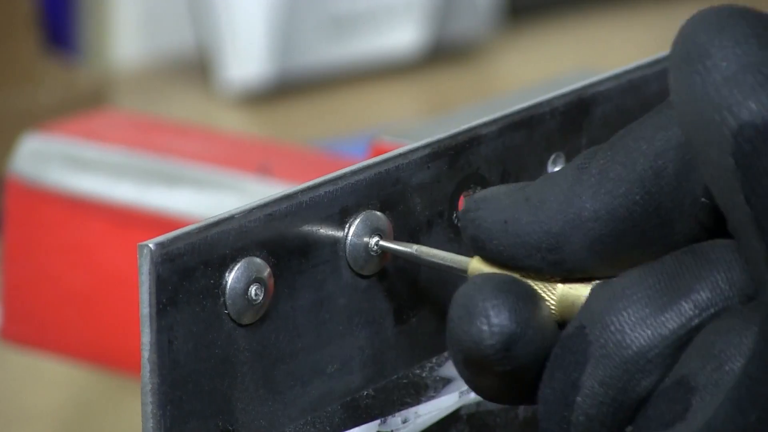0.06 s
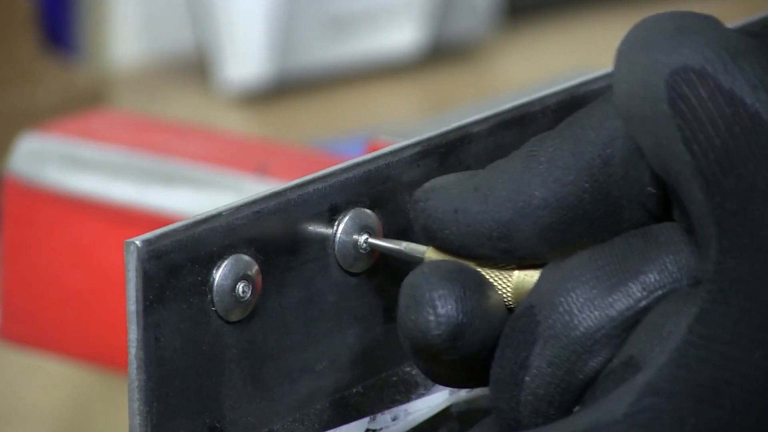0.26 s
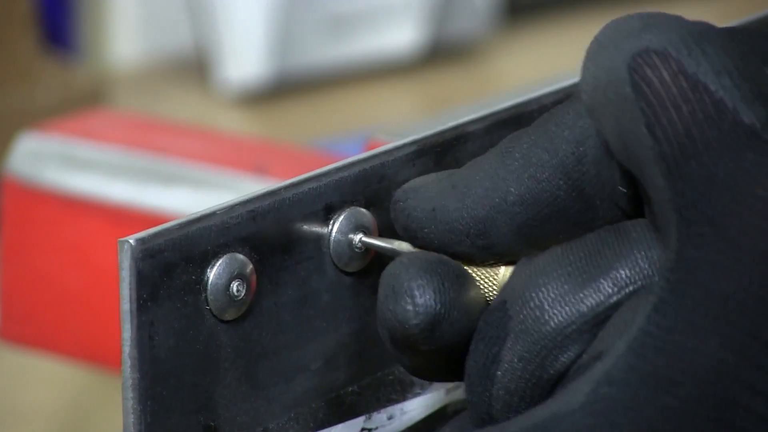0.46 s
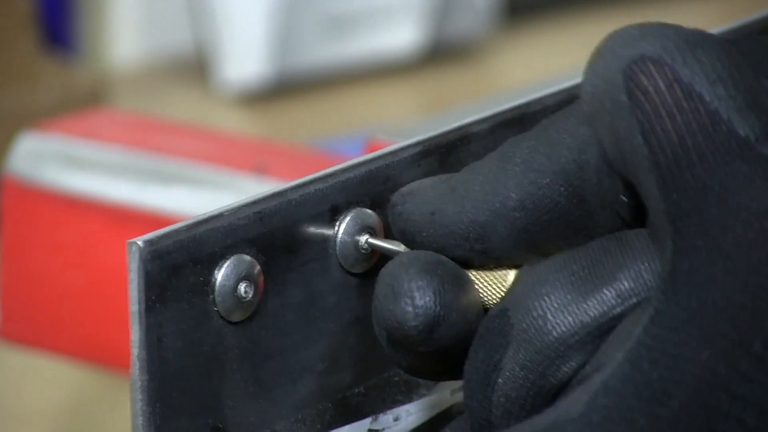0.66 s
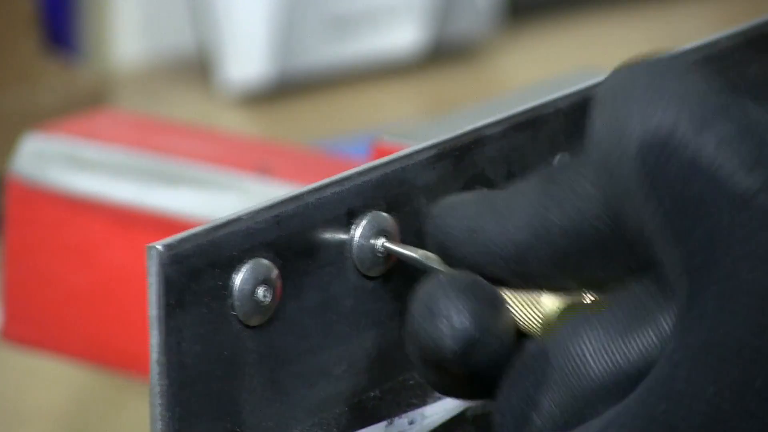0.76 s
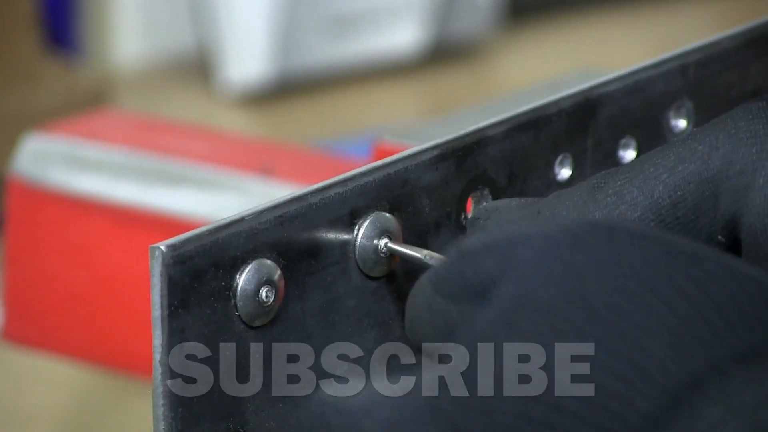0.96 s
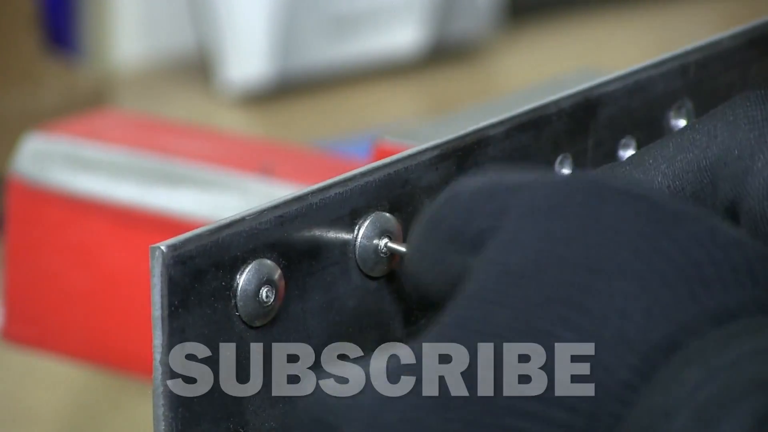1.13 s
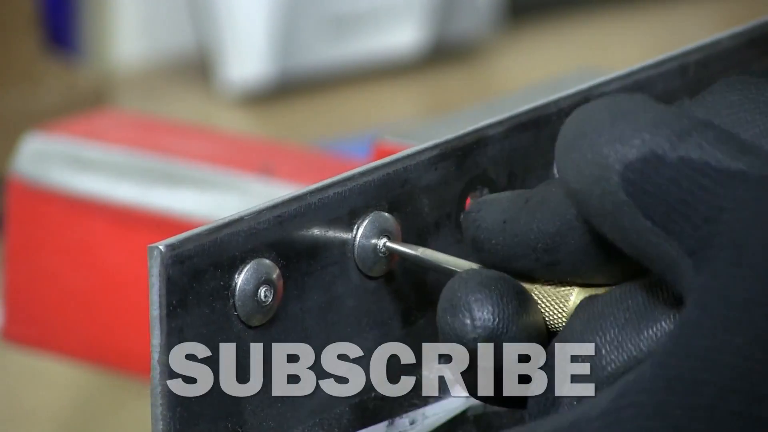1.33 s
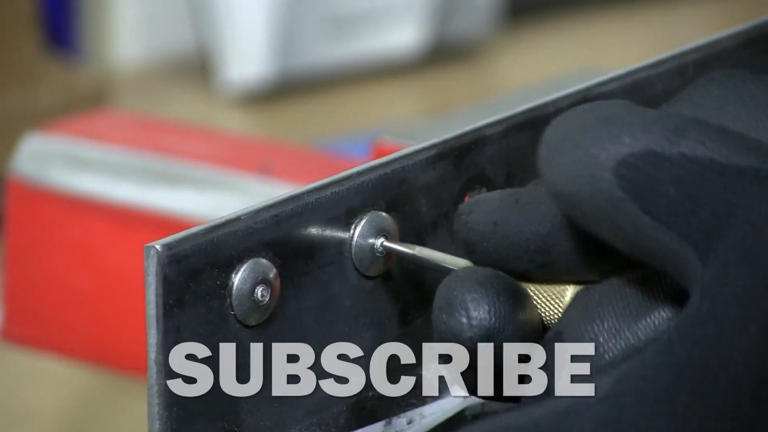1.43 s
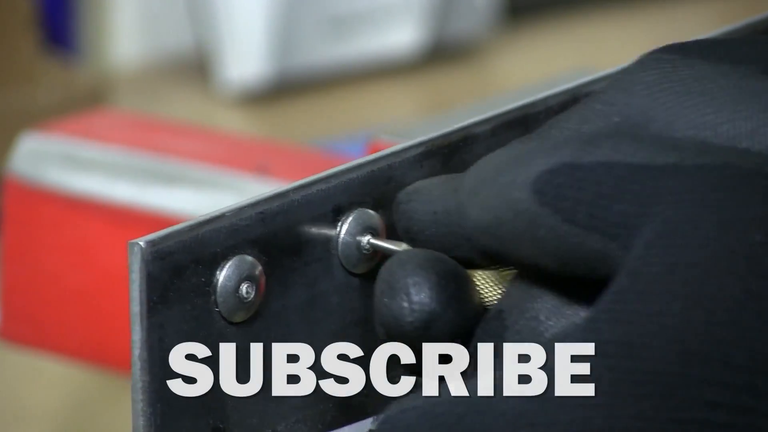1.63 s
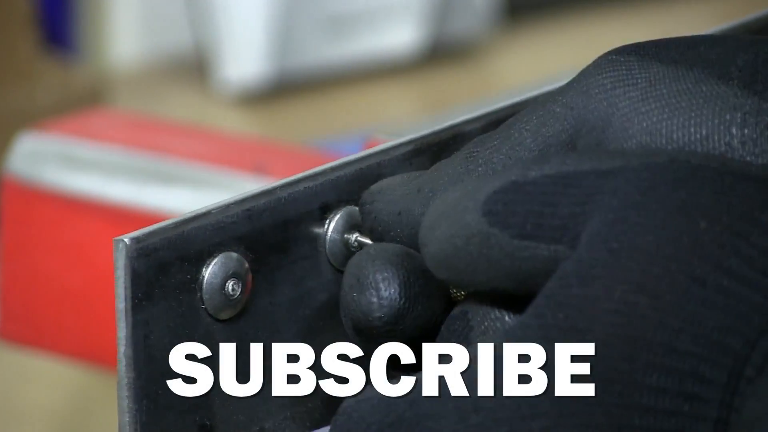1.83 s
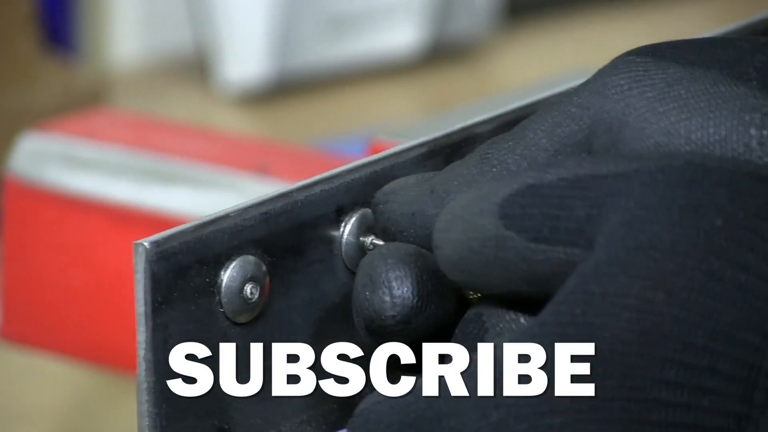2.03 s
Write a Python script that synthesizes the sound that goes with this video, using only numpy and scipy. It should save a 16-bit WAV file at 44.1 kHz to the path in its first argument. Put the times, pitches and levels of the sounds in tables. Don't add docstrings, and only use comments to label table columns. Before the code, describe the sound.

Two hard metallic punch clicks on a riveted steel plate, faint scraping between, in a quiet workshop

```python
import sys
import numpy as np
from scipy import signal
from scipy.fft import rfft, irfft, next_fast_len
from scipy.io import wavfile
from scipy.ndimage import uniform_filter1d

SR = 44100
rng = np.random.default_rng(int(sys.argv[2]) if len(sys.argv) > 2 else 0)


def unload_audio(sound):
    columns = np.transpose(np.atleast_2d(sound))
    steps = np.round(np.clip(columns, -1, 1) * 32767)
    wavfile.write(sys.argv[1], SR, steps.astype(np.int16))


def makeup_ratio(level_db):
    decades = np.asarray(level_db, float) / 20
    return 10 ** decades


N = 91816

# frequency [Hz], first blow [dB], second blow [dB], t60 [s].
PLATE_MODES = [(336, -40, -38, 0.42), (887, -37, -39, 0.24), (945, -50, -53, 0.4), (1011, -31, -29, 0.22),
               (1222, -38, -39, 0.33), (1591, -29, -34, 0.15), (1713, -34, -41, 0.32),
               (1818, -31, -40, 0.23), (1920, -38, -41, 0.31), (2077, -33, -36, 0.27),
               (2865, -49, -47, 0.32), (2949, -35, -37, 0.18), (3059, -49, -48, 0.4), (3204, -48, -46, 0.4)]
RIVET_MODES = [(3912, -31, -34, 0.22), (4165, -38, -33, 0.24), (4510, -29, -38, 0.14),
               (4687, -21, -21, 0.13), (4799, -28, -34, 0.13), (5145, -39, -31, 0.18),
               (5385, -29, -24, 0.16), (5575, -37, -33, 0.14), (5819, -27, -25, 0.11),
               (5936, -25, -27, 0.21), (6029, -24, -21, 0.13), (6360, -24, -23, 0.11),
               (6566, -41, -32, 0.17), (6756, -36, -17, 0.09)]
PUNCH_MODES = [(7039, -23, -16, 0.13), (7177, -25, -20, 0.11), (7502, -37, -21, 0.12),
               (7601, -38, -29, 0.19), (8161, -42, -40, 0.25), (8489, -39, -30, 0.14),
               (8761, -49, -38, 0.22), (9314, -62, -45, 0.4), (9928, -36, -20, 0.13),
               (10266, -49, -41, 0.16), (10558, -47, -38, 0.21), (11240, -64, -48, 0.37),
               (12065, -45, -37, 0.19), (14127, -48, -52, 0.16)]
FAINT_MODES_HZ = [8820, 8970, 11780, 13300, 12740, 13100, 13400, 14400, 15300]


def unit(x):
    return x / np.sqrt(np.mean(x ** 2) + 1e-20)


def along(points, hz):
    f, v = np.transpose(points)
    return np.interp(np.log(hz + 1), np.log(f + 1), v)


def filtered(x, response):
    m = next_fast_len(x.shape[-1] + 8192)
    spectrum = rfft(x, m) * response(np.fft.rfftfreq(m, 1 / SR))
    return irfft(spectrum, m)[..., :x.shape[-1]]


def add(track, s, sound):
    part = track[round(s * SR):][:len(sound)]
    part += sound[:len(part)]


def swell(t, rise_s, t60):
    rise = np.sin(np.pi / 2 * np.clip(t / rise_s, 0, 1)) ** 2
    return rise * makeup_ratio(-60 * np.maximum(t - rise_s, 0) / t60)


def resonances(peaks):
    def response(f):
        total = 0
        for k, (hz, width, db) in enumerate(sorted(peaks)):
            damping = 1j * f * width
            total = total + (-1) ** k * makeup_ratio(db) * damping / (hz * hz - f * f + damping)
        return total
    return response


def steel_wash(noise, after, steel):
    level_db, tilt_db_oct = -15.5, 5.5
    t60_s, top_t60_s, top_hz = 0.3, 0.3, 11500
    bright = unit(filtered(noise, lambda hz: makeup_ratio(tilt_db_oct * np.log2(hz + 1)) * steel(hz)))
    top = filtered(bright, lambda hz: 1 / (1 + (top_hz / (hz + 1)) ** 10))
    body = bright - top
    return makeup_ratio(level_db) * (body * makeup_ratio(-60 * after / t60_s) + top * makeup_ratio(-60 * after / top_t60_s))


def blows():
    # start [s], rise [s], clash [dB], push of air [dB], bench sway [dB].
    strikes = [
        (.4293, 0.0047, -19, -28, -28.5),
        (1.7946, 0.0088, -17, -26.5, -28),
    ]
    # frequency [Hz], density [dB per Hz].
    clash_spectra = [
        [(88, -43.5), (150, -20), (637, -12), (1260, -12.5), (3920, -5), (4240, -9), (6140, -12), (7620, -16.5),
         (16000, -31.5)],
        [(88, 13), (150, 1.5), (589, -15), (1390, -4.5), (2400, -6.5), (3300, -5), (4760, -6.5), (6510, -5.5),
         (16000, -20.5)],
    ]
    # frequency [Hz], first blow [dB], second blow [dB], t60 [s].
    clamp_modes = [(6433, -45, -34, .2), (3488, -48, -37, .2), (9364, -50, -35, .15), (3160, -50, -47, .45),
                   (897, -46, -42, .6), (991, -50, -47, .6), (3890, -16, -24, .045), (770, -56, -50, .35),
                   (813, -48, -51, .5), (951, -54, -52, .9), (1071, -52, -45, .28), (1305, -45, -46, .24),
                   (868, -45, -36, .1)]
    ring_db, ring_lag = 0, 1.35
    clash_hold_s, clash_t60_s, clash_width_hz, wash_width_hz = 0.0032, 0.06, 408, 70
    push_hz, push_t60_s, sway_hz, sway_t60_s = 260, 0.018, 36, 0.12

    tones, near, low = np.zeros((3, N))
    t = np.arange(SR // 2) / SR
    modes = np.array([*PLATE_MODES, *RIVET_MODES, *PUNCH_MODES, *clamp_modes])
    mode_hz, mode_t60 = modes[:, [0]], modes[:, [3]]
    steel = resonances([(hz, wash_width_hz, 0) for hz in [*modes[:, 0], *FAINT_MODES_HZ]])
    struck_modes = [*PLATE_MODES[::2], *RIVET_MODES[::3], *PUNCH_MODES]
    struck_hz = [mode[0] for mode in struck_modes] + [*FAINT_MODES_HZ]
    struck = resonances([(hz, clash_width_hz, 0) for hz in struck_hz])

    for k, (s, rise_s, clash_db, push_db, sway_db) in enumerate(strikes):
        phase = rng.uniform(0, 2 * np.pi, (len(modes), 1))
        ring = makeup_ratio(modes[:, [1 + k]] - 60 * t / mode_t60) * np.sin(2 * np.pi * mode_hz * t + phase)
        add(tones, s, makeup_ratio(ring_db) * ring.sum(axis=0) * swell(t, ring_lag * rise_s, np.inf))

        noise = rng.standard_normal(len(t))
        noise = unit(filtered(noise, lambda hz: makeup_ratio(along(clash_spectra[k], hz))))
        after = np.maximum(t - rise_s - clash_hold_s, 0)
        clash = unit(filtered(noise, struck)) * makeup_ratio(-60 * after / clash_t60_s)
        clash = clash + steel_wash(noise, after, steel)
        add(near, s, makeup_ratio(clash_db) * clash * swell(t, rise_s, np.inf))

        push = -makeup_ratio(push_db) * np.sin(2 * np.pi * push_hz * t) * swell(t, 0.002, push_t60_s)
        sway = makeup_ratio(sway_db) * np.sin(2 * np.pi * sway_hz * t) * swell(t, 0.0049, sway_t60_s)
        add(low, s + rise_s / 2, push + sway)
    return tones, near, low


def knocks(table, spread):
    out, t = np.zeros(N), np.arange(SR // 5) / SR
    detune = 1 + spread * np.array([[-1], [0], [1.3]])
    for s, db, hz, t60 in table:
        tones = np.sin(2 * np.pi * hz * detune * t + rng.uniform(0, 1, (3, 1)))
        add(out, s, makeup_ratio(db) / 2 * tones.sum(axis=0) * swell(t, 0.5 / hz, t60))
    return out


def clamp_thuds():
    # start [s], level [dB], frequency [Hz], t60 [s].
    jolts = [
        (.4325, -23, 640, 0.026),
        (.4395, -20.5, 1780, .07),
        (1.8, -24.5, 320, 0.023),
        (1.8025, -22, 840, 0.038),
        (1.8005, -24, 1320, 0.0365),
        (1.8, -16.5, 3250, 0.041),
        (.433, -18.5, 3200, .04),
    ]
    return knocks(jolts, spread=0.06)


def side_treble():
    # frequency [Hz], density [dB per Hz].
    treble_spectrum = [(4300, -60), (5000, -0.5), (10500, 0), (16000, -15)]
    start_s, length_s, level_db = 1.7925, 0.012, -38.5
    out, t = np.zeros(N), np.arange(SR // 10) / SR
    treble = unit(filtered(rng.standard_normal(len(t)), lambda hz: makeup_ratio(along(treble_spectrum, hz))))
    arch = np.sin(np.pi * np.clip(t / length_s, 0, 1))
    add(out, start_s, makeup_ratio(level_db) * treble * arch)
    return out


def tip(table, width_oct, grind_db, broad_db):
    # frequency [Hz], width [Hz], level [dB].
    pressed_peaks = [(1660, 36, -4), (2790, 43, -6), (3430, 41, 0), (3800, 80, -4), (4470, 41, -1),
                     (4760, 34, -4), (5100, 53, -5)]
    grit_db, free_width_hz, free_db = 5, 24, -4
    force, t = np.zeros(N), np.arange(SR // 4) / SR
    for s, rise_s, t60, db, centre_hz in table:
        roughness = unit(uniform_filter1d(rng.standard_normal(len(t)), size=60))
        grit = rng.standard_normal(len(t)) * makeup_ratio(grit_db * roughness)
        grit = unit(filtered(grit, lambda hz: np.exp(-(np.log2((hz + 1) / centre_hz) / width_oct) ** 2 / 2)))
        add(force, s, makeup_ratio(db) * grit * swell(t, rise_s, t60))
    free_hz = [mode[0] for mode in [*PLATE_MODES, *RIVET_MODES, *PUNCH_MODES]] + [*FAINT_MODES_HZ]
    free = [(hz, free_width_hz, free_db) for hz in free_hz]
    damped = resonances([(hz, width, db + grind_db) for hz, width, db in pressed_peaks] + free)
    return makeup_ratio(9) * filtered(force, lambda f: makeup_ratio(broad_db) + damped(f))


def tip_grinding():
    # start [s], rise [s], fall t60 [s], level [dB], centre frequency [Hz].
    scrapes = [(.15, 0.032, 0.56, -64.5, 4400), (.196, 0.0051, 0.044, -50.5, 4000),
               (.265, 0.024, 0.16, -58, 1530), (.272, 0.0098, 0.096, -52, 4200),
               (.274, 0.0033, 0.06, -64.5, 11000), (.294, 0.0033, 0.042, -60.5, 6500),
               (.325, 0.005, 0.038, -55.5, 4660), (.252, .003, 0.051, -61, 4500),
               (.826, .04, .3, -64, 4300), (.841, .03, .3, -58, 1450), (.846, .03, .15, -66, 12500),
               (.9, .012, .3, -62, 5700), (1.552, 0.0204, 0.3, -67.5, 4300),
               (1.575, 0.0064, 0.07, -66.5, 11140), (1.63, 0.055, 0.25, -66, 1650),
               (1.58, 0.0023, 0.038, -63.5, 5000), (1.598, 0.0024, 0.037, -62, 4700),
               (1.616, .003, 0.044, -61, 4800), (1.69, 0.0028, 0.057, -55.5, 4000),
               (1.637, 0.005, 0.05, -57.5, 4720), (1.673, 0.004, 0.06, -58, 4160),
               (1.706, 0.0023, 0.045, -54, 4800), (1.774, 0.0044, 0.074, -55, 5000),
               (1.672, .003, .03, -57.5, 1600), (1.705, .003, 0.028, -56, 1700),
               (1.774, .003, 0.035, -58, 1450)]
    return tip(scrapes, width_oct=0.4, grind_db=0, broad_db=-21)


def tip_tapping():
    # start [s], rise [s], fall t60 [s], level [dB], centre frequency [Hz].
    contacts = [
        (.8768, 0.00092, 0.049, -43.5, 6100),
        (.8770, 0.00069, 0.063, -46.5, 3870),
        (.877, .0007, 0.033, -60, 9500),
        (1.2108, .001, 0.036, -57.5, 2540),
        (1.211, 0.00086, 0.029, -49, 6050),
        (1.2114, 0.00078, 0.016, -50, 14400),
        (1.4303, 0.00058, 0.038, -47, 1510),
        (1.4306, 0.001, 0.033, -58, 3310),
        (1.431, 0.00096, 0.035, -60, 6360),
    ]
    return tip(contacts, width_oct=0.28, grind_db=-5, broad_db=-12)


def spring_squeaks():
    # start [s], hold [s], level [dB], frequency [Hz].
    notes_held = [(.177, 0.011, -61, 3410), (.197, 0.017, -55.5, 3430), (.252, 0.013, -65, 4440),
                  (0.275, 0.024, -56.5, 4460), (.295, 0.013, -59, 5840), (0.325, 0.0094, -56.5, 3870),
                  (.832, 0.021, -67, 3780), (0.86, 0.012, -60, 4760), (.888, 0.027, -63, 4480),
                  (0.909, 0.011, -65, 3460), (1.6, .06, -70.5, 5150), (1.562, 0.11, -66, 3430),
                  (1.592, .06, -69, 2810), (1.638, 0.022, -59.5, 5000), (1.673, 0.011, -57, 3780),
                  (1.675, 0.047, -67, 5930), (1.677, 0.042, -69, 5100), (1.735, 0.013, -70, 4480),
                  (1.213, 0.031, -65, 3460)]
    rise_s, t60_s, shake_db, waver_rad = 0.0054, 0.022, 2, 0.6
    out, t = np.zeros(N), np.arange(SR // 5) / SR
    for s, hold_s, db, hz in notes_held:
        shake, waver = [unit(uniform_filter1d(row, size=200)) for row in rng.standard_normal((2, len(t)))]
        fall_db = -60 * np.maximum(t - hold_s, 0) / t60_s
        shape = swell(t, rise_s, np.inf) * makeup_ratio(shake_db * shake + fall_db)
        add(out, s, makeup_ratio(db) * shape * np.sin(2 * np.pi * hz * t + waver_rad * waver))
    return out


def glove_creaks():
    # start [s], level [dB], frequency [Hz].
    slips = [(0.044, -63, 10100), (.122, -64, 9000), (0.127, -61, 9100), (.134, -59.5, 8800),
             (0.146, -60, 11000), (.146, -64, 8700), (0.152, -59.5, 8350), (.152, -63, 11000),
             (.322, -64, 11000), (1.504, -58.5, 8700), (1.708, -58, 8700)]
    t60_s = 0.009
    return knocks([(s, db, hz, t60_s) for s, db, hz in slips], spread=0.11)


def hand_bumps():
    # start [s], level [dB], frequency [Hz], t60 [s].
    touches = [
        (.369, -41, 170, 0.063),
        (.393, -40.5, 90, 0.044),
        (.632, -37.5, 408, 0.029),
        (.695, -42.5, 328.7, 0.12),
        (.705, -48, 621, 0.07),
        (.721, -38, 215, 0.029),
        (.885, -47, 40, 0.067),
        (1.29, -47, 253, 0.057),
        (1.771, -40.5, 144.5, 0.055),
        (1.784, -42, 90, 0.035),
    ]
    return knocks(touches, spread=0.38)


def shop(x):
    # frequency [Hz], t60 [s].
    decay = [(200, 0.22), (2000, 0.78), (7000, 0.49), (11000, 0.5), (15000, 0.25)]
    delay_s = 0.0073
    hz, t, z = signal.stft(rng.standard_normal(SR // 2), SR, nperseg=256)
    tail = signal.istft(z * makeup_ratio(-60 * t / along(decay, hz)[:, None]), SR, nperseg=256)[1]
    delayed = np.pad(x, (round(delay_s * SR), 0))
    return signal.fftconvolve(delayed, tail / np.linalg.norm(tail))[:N]


def air():
    # frequency [Hz], density [dB per Hz].
    hush_spectrum = [(22, -2), (205, -8), (837, -12), (2300, -24), (5000, -32.5), (16000, -43)]
    # time [s], level [dB].
    hush_level = [(0, -65.5), (.3, -62.5), (.85, -61), (1.151, -67.5), (1.299, -64), (2.08, -66)]
    # frequency [Hz], width [Hz], height over the hush [dB].
    drones = [(98, 22, 8), (206.3, 18, 10.5), (346.3, 22, 10)]
    gain_db, patch_db = 4.5, 2.2

    z = signal.stft(rng.standard_normal(N + 512), nperseg=512)[2]
    field = uniform_filter1d(rng.standard_normal(z.shape), size=5, axis=0)
    field = uniform_filter1d(field, size=10, axis=1)
    hush = signal.istft(z * makeup_ratio(patch_db * unit(field)), nperseg=512)[1][:N]

    def colour(hz):
        humps_db = sum(db / (1 + ((hz - centre) / width * 2) ** 2) for centre, width, db in drones)
        return makeup_ratio(along(hush_spectrum, hz) + humps_db)

    s, level_db = np.transpose(hush_level)
    level = makeup_ratio(gain_db + np.interp(np.arange(N) / SR, s, level_db))
    return level * unit(filtered(hush, colour))


def scene():
    shop_db, ring_to_shop_db = -19.5, -6
    tones, near, low = blows()
    near = near + clamp_thuds() + tip_grinding() + tip_tapping() + spring_squeaks() + glove_creaks()
    room = makeup_ratio(shop_db) * shop(near + makeup_ratio(ring_to_shop_db) * tones)
    mono = tones + near + room + low + hand_bumps() + air()
    side = side_treble()
    return np.array([mono + side, mono - side])


def low_pass(x):
    return signal.sosfilt(signal.butter(12, 16390, fs=SR, output="sos"), x)


def record(dry):
    ceiling, top_hz, edge_hz = 0.65, 15700, 60
    soft = ceiling * np.tanh(dry / ceiling)
    mix = filtered(soft, lambda hz: 0.5 - 0.5 * np.tanh((hz - top_hz) / edge_hz))
    return low_pass(mix)


dry = scene()
out = record(dry)
unload_audio(out)
```